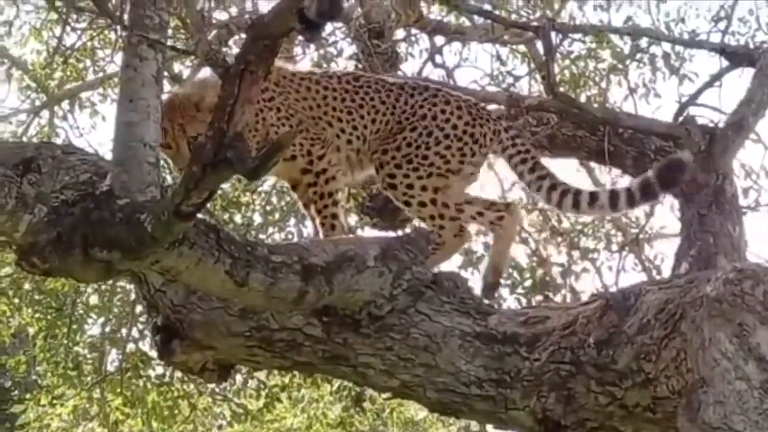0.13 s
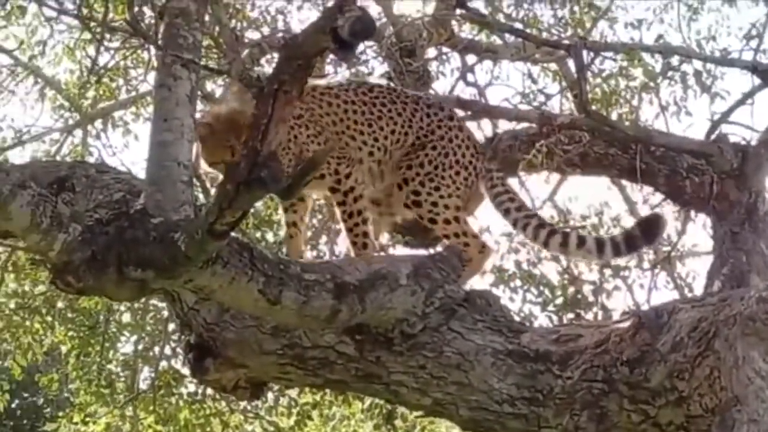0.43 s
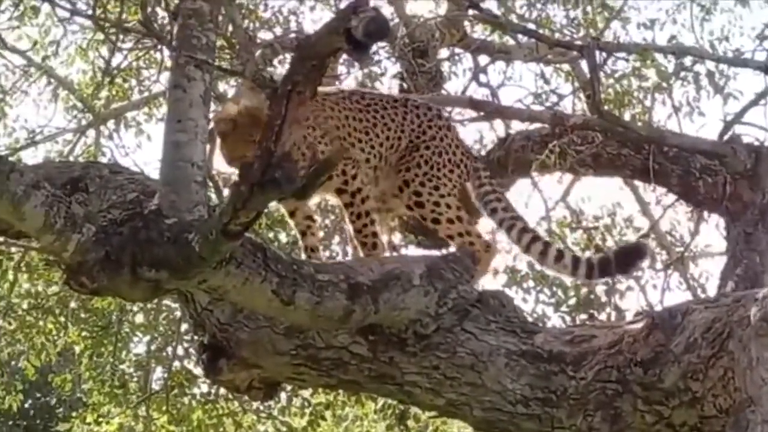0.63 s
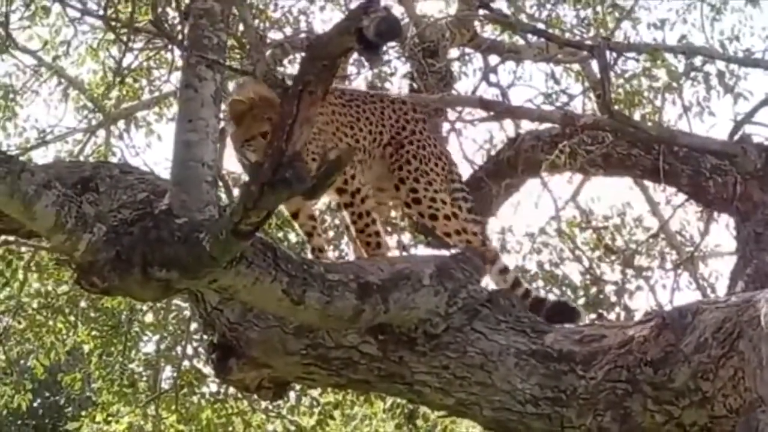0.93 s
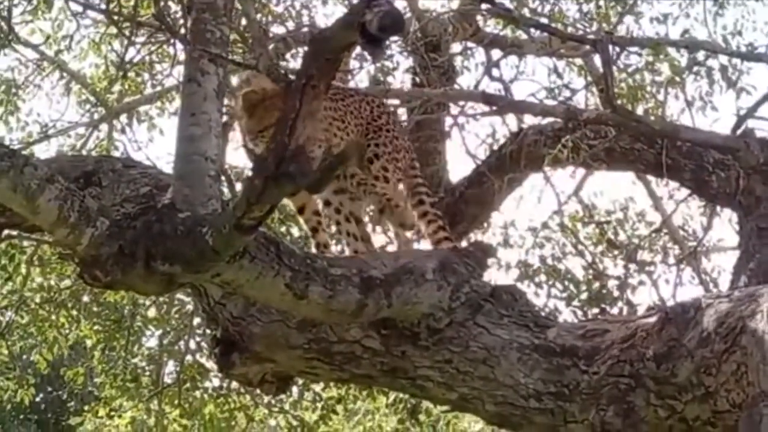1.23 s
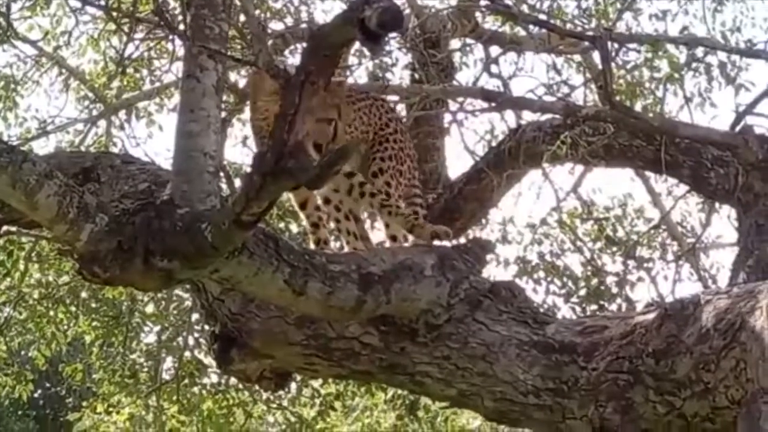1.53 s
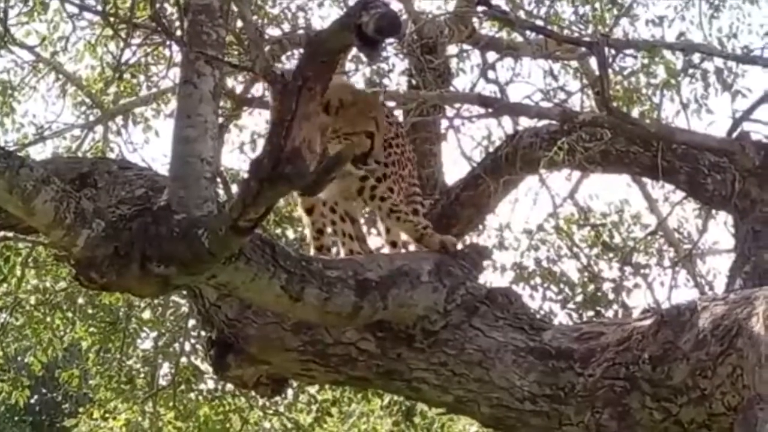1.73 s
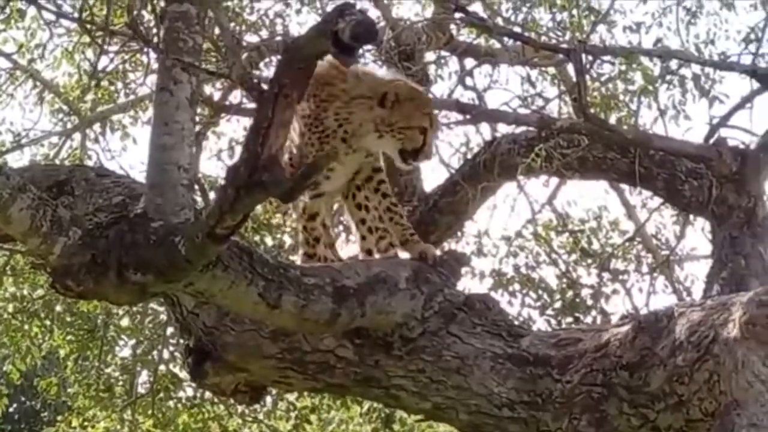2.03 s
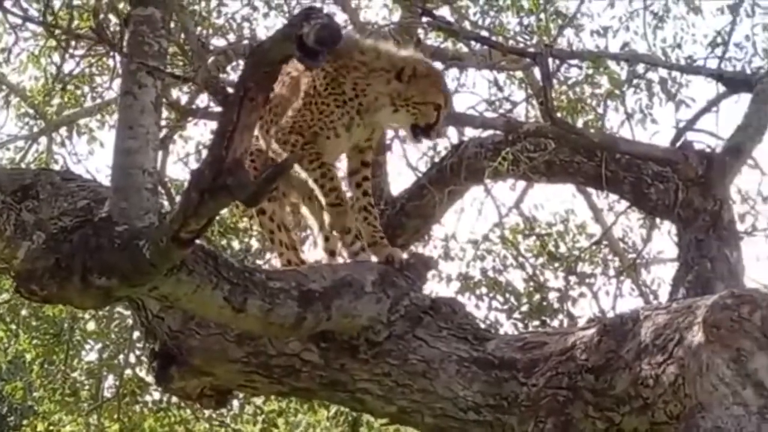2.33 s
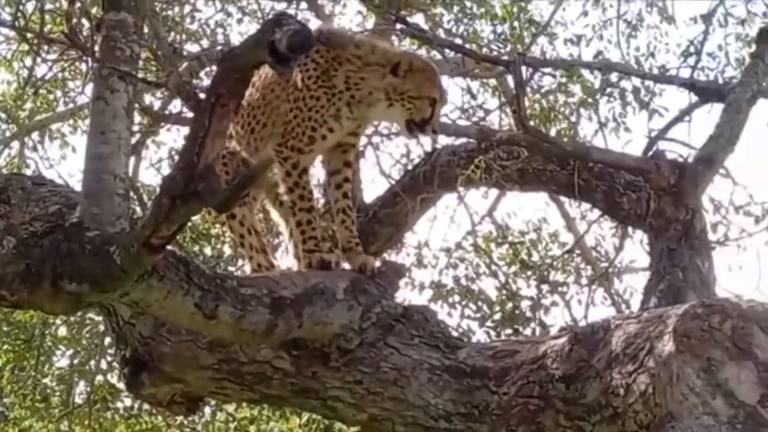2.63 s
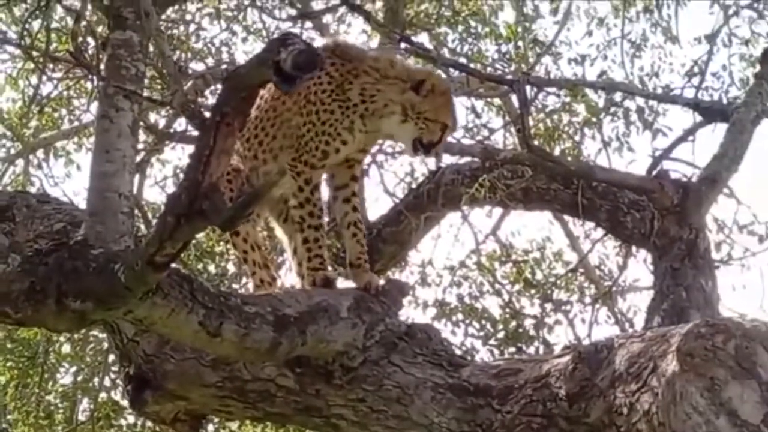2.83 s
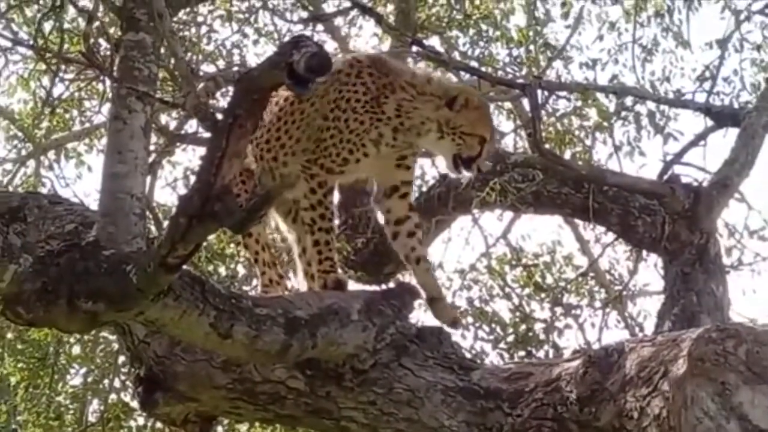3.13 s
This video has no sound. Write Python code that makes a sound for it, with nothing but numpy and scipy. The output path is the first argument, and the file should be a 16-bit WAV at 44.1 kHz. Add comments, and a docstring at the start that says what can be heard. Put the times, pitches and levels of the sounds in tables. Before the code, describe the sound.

One whistled bird call drops in pitch outdoors, above fast trills, cricket chirps and engine rumble

```python
"""Woodland with an idling engine

Open woodland by day. An engine idles a little way off to the right, built from wobbling sine orders over
bands of rumble and air noise. A small bird trills raspy hooked notes on a gliding pitch; a cricket chirps in
tone pulses, a rougher insect buzzes and there is a very faint dry click. A bush bird whistles a held note
that falls, a low short note answers, and the trees scatter both back as dying random echoes."""
import sys
import numpy as np
from scipy import signal
from scipy.io import wavfile

SR = 44100
rng = np.random.default_rng(int(sys.argv[2]) if len(sys.argv) > 2 else 0)


def unload_wav(signal):
    """Save mono or channel-first audio to the path in sys.argv[1] as 16-bit WAV at rate SR, clipped to [-1, 1]."""
    wavfile.write(
        sys.argv[1],
        SR,
        np.round(np.clip(np.atleast_2d(signal).T, -1, 1) * 32767).astype(np.int16),
    )


def boost(x):
    """Linear amplitude factor 10**(x/20) for a level x in decibels (scalar or array-like)."""
    u = np.asarray(x, float) / 20
    return 10 ** u


N = 144207  # length in samples

TREES_T60_S, TREES_ECHOES_PER_S = 0.62, 2000
# wet level and first-echo gap shared by the trill and the cricket
NEAR_WET_DB, NEAR_GAP_S = -7, 0.01


def rms_one(x):
    """Scale to rms 1."""
    return x / np.sqrt(np.mean(x ** 2) + 1e-20)


def in_time(rows):
    """Columns of a table, joined by straight lines in time."""
    time_s, *columns = np.transpose(rows)
    return [np.interp(np.arange(N) / SR, time_s, column) for column in columns]


def at_hz(points, hz):
    """Read a table on a log-frequency axis."""
    table_hz, values = np.transpose(points)
    return np.interp(np.log(hz), np.log(table_hz), values)


def drift(rate_hz):
    """Random wander of rms 1: noise through a two-pole low-pass, drawn every 40 samples."""
    pole = np.exp(-2 * np.pi * rate_hz * 40 / SR)
    noise = rng.standard_normal(N // 40 + 2002)
    slow = signal.lfilter([1], [1, -2 * pole, pole * pole], noise)[2000:]
    return np.interp(np.arange(N) / 40, np.arange(len(slow)), rms_one(slow))


def phase(hz):
    """Running phase of a pitch curve, in radians."""
    return 2 * np.pi * np.cumsum(hz) / SR


def place(x, left_db, left_lag_s):
    """Pan to the right: the left channel is weaker and may come later."""
    sample = np.arange(N)
    left = boost(left_db) * np.interp(sample - left_lag_s * SR, sample, x)
    return np.array([left, x])


def trees(x, t60_s, gap_s):
    """Scattered echoes off trunks, other ones for each ear, dying away."""
    t = np.arange(SR) / SR
    hit = rng.random((2, SR)) < TREES_ECHOES_PER_S / SR
    echoes = rng.standard_normal((2, SR)) * hit * boost(-60 * t / t60_s) * (t > gap_s)
    echoes = echoes / np.sqrt(np.sum(echoes ** 2, axis=1, keepdims=True))
    return signal.fftconvolve(x[None], echoes, axes=1)[:, :N]


# engine idle, before the order trims: time_s, firing_pattern_hz, level_db
ENGINE_IDLE = [(0, 46.9, -30), (.7, 45.18, -28), (1.39, 47.06, -31), (1.6, 46.43, -29), (2.4, 46.38, -32),
               (2.48, 46.1, -26.5), (2.6, 45.86, -31), (2.8, 46.78, -27), (3.04, 46.63, -32),
               (3.15, 47.87, -31.5)]
# engine orders: multiple, trim_db, left_minus_right_db, wobble_db
ORDERS = [(2, 1, -7, 1.21), (3, -16, -6.5, 2), (4, -19, -6.5, 4.5), (5, -20, -3, 1), (6, -31, -6, 4.5)]
ORDER_LIFT_DB, ENGINE_LEFT_LEAD_S = 4, 0.00035
WHINE_HZ, WHINE_DB = 1046, -77.5  # centres that the whine wanders around


def engine():
    """Sine orders of the idling engine, each wobbling in level and phase on its own, plus a faint whine."""
    hz, idle_db = in_time(ENGINE_IDLE)
    turn, out = phase(hz), 0
    for k, trim_db, left_db, wobble_db in ORDERS:
        # only the second order follows the level curve; the others keep its mean
        base_db = idle_db if k == 2 else idle_db.mean()
        level = boost(base_db + ORDER_LIFT_DB + trim_db + wobble_db * drift(15.4))
        right_turn = k * turn + 0.11 * wobble_db * drift(10.4) + 2 * np.pi * rng.random()
        left_turn = right_turn + 2 * np.pi * k * hz * ENGINE_LEFT_LEAD_S
        out = out + level * np.array([boost(left_db) * np.sin(left_turn), np.sin(right_turn)])
    whine = boost(WHINE_DB + 2 * drift(6.9)) * np.sin(phase(WHINE_HZ + 10 * drift(10.25)))
    return out + whine


# relative spectrum of rumble and air: pitch_hz, density_db (per Hz)
AIR_SPECTRUM = [(22, -54.5), (40, -6.5), (190, -6), (260, -20.5), (400, -30), (650, -36), (2300, -37.5),
                (4500, -46), (7300, -46), (8300, -53), (12500, -45)]
# stereo likeness: pitch_hz, left_right_correlation (-1 to 1)
AIR_ALIKE = [(60, 0.45), (290, 0.29), (1400, -0.19)]
# stereo balance: pitch_hz, left_minus_right_db
AIR_TILT = [(250, -2), (900, 1), (5000, -1.5)]
AIR_DB = -44  # rms of the whole bed


def air():
    """Third-octave bands of stereo noise: engine rumble below, leaves and hiss above."""
    out, edges = 0, 22 * 2 ** (np.arange(0, 30) / 3)
    white = rng.standard_normal((2, 2, N + SR))
    for k, (low, high) in enumerate(zip(edges, edges[1:])):
        band = signal.butter(2, [low, high], "band", fs=SR, output="sos")
        # neighbouring bands take different noise; the first second lets the filter settle
        mid, side = signal.sosfilt(band, white[k % 2])[:, SR:]
        hz = np.sqrt(low * high)
        alike = np.clip(at_hz(AIR_ALIKE, hz), -.99, .99)
        half_tilt_db = at_hz(AIR_TILT, hz) / 2
        level_db = at_hz(AIR_SPECTRUM, hz) + 1.73 * (hz < 8000) * drift(11)
        gain = boost(level_db) * boost([[half_tilt_db], [-half_tilt_db]])
        out = out + gain * (np.sqrt(1 + alike) * mid + np.sqrt(1 - alike) * side * [[1], [-1]])
    return boost(AIR_DB) * rms_one(out)


# cricket chirps in turn, dry pulse peaks: level_db
CHIRP_LEVELS = [-68, -65, -66.5, -68, -71, -69, -71, -71, -68, -62.5, -82]
CHIRP_FIRST_S, CHIRP_GAP_S = 0, 0.3186  # gap: from one chirp start to the next
CRICKET_HZ, PULSE_GAP_S, PULSE_S = 7420, 0.041, 0.034
PULSE_SAG_HZ = 288  # pitch drop reached at the end of a pulse


def cricket():
    """Four soft-edged tone pulses to a chirp, each sagging in pitch towards its end."""
    t, level, sag_hz = np.arange(N) / SR, np.zeros(N), np.zeros(N)
    for i, level_db in enumerate(CHIRP_LEVELS):
        for k in range(4):
            start_s = CHIRP_FIRST_S + i * CHIRP_GAP_S + k * PULSE_GAP_S
            part = np.clip((t - start_s) / PULSE_S, 0, 1)
            level += boost(level_db) * np.sin(np.pi * part)
            sag_hz += PULSE_SAG_HZ * part ** 2 * (part < 1)
    song = level * np.sin(phase(CRICKET_HZ * (1 + 0.0089 * drift(67)) - sag_hz))
    return song + boost(NEAR_WET_DB) * trees(song, TREES_T60_S / 2, NEAR_GAP_S)


BUZZ_HZ, BUZZ_DB = 6970, -67  # centre pitch, and centre level before the rasp


def buzz():
    """A second, rougher insect: a wide ragged buzz that swells and fades, heard on the right."""
    swell = boost(BUZZ_DB + 3.7 * drift(14))
    rasp = drift(600)
    tone = np.sin(phase(BUZZ_HZ * (1 + 0.051 * drift(8.5))))
    return place(swell * rasp * tone, -9, 0)


# trill notes, levels before the rasp: hook_s (final hook), hook_hz, hook_db, valley_db
TRILL_NOTES = [(0.012, 6100, -50, -37), (0.085, 6027, -44, -55.5), (.164, 5766, -49, -54.5),
               (0.243, 5740, -54.5, -53), (0.32, 5514, -53.5, -57), (0.397, 5695, -48.5, -53),
               (0.472, 5746, -44, -47), (0.553, 5880, -46, -43.5), (0.635, 5580, -45.5, -45.5),
               (.711, 5546, -46.5, -51), (.79, 5596, -49, -52.5), (0.873, 5140, -55, -52.5),
               (0.951, 5346, -51.5, -49), (1.034, 5590, -43.5, -48.5), (1.116, 5700, -43, -49),
               (1.201, 5867, -40.5, -47), (1.282, 5794, -44, -48), (1.372, 5800, -42, -51.5),
               (1.445, 5266, -64, -55), (1.517, 5657, -37.5, -49), (1.6, 5633, -43.5, -47.5),
               (1.698, 5690, -44, -51), (1.791, 5400, -52.5, -54.5), (1.883, 5450, -60, -53),
               (1.978, 5630, -55.5, -51.5), (2.054, 5510, -56, -55.5), (2.138, 5370, -63.5, -55),
               (2.237, 5357, -46.5, -57), (2.325, 5320, -51, -58), (2.422, 5540, -51, -57.5),
               (2.535, 4950, -62.5, -62.5), (2.79, 4494, -68, -70.5), (2.92, 5000, -52.5, -60.5),
               (3.039, 5060, -61.5, -64), (3.141, 5003, -53, -65), (3.24, 5230, -46, -62)]
# how notes set in and how low they dip: time_s, entry_hz, valley_hz
TRILL_SHAPE = [(0, 6600, 5810), (0.551, 6886, 5460), (.85, 6300, 5320), (1.951, 5690, 5162),
               (3.27, 5286, 4810)]
ENTRY_S, VALLEY_S, RISE_S = 0.035, 0.025, 0.013  # before the hook
EDGE_S, RELEASE_S = 0.006, 0.02
ENTRY_UNDER_VALLEY_DB, GLIDE_DIP_DB = -7, -5
TRILL_RASP = 0.47  # depth of the fast random flutter
ENTRY_SCATTER = 0.3  # pitch scatter, growing with height over the valley
LOW_PARTIAL_DB, TRILL_LEFT_DB, TRILL_T60_S = -12, -9, 0.2


def trill():
    """Each raspy note drops from its entry into a valley and hooks up at the end; the glides are faint."""
    shape_s, shape_entry_hz, shape_valley_hz = np.transpose(TRILL_SHAPE)
    rows = []  # time_s, pitch_hz, level_db
    for s, hook_hz, hook_db, valley_db in TRILL_NOTES:
        entry_hz = np.interp(s, shape_s, shape_entry_hz)
        valley_hz = np.interp(s, shape_s, shape_valley_hz)
        entry_db, glide_db = valley_db + ENTRY_UNDER_VALLEY_DB, valley_db + GLIDE_DIP_DB
        rows += [
            (s - ENTRY_S - 2 * EDGE_S, entry_hz, -80),
            (s - ENTRY_S - EDGE_S, entry_hz, entry_db),
            (s - ENTRY_S, entry_hz, entry_db),
            (s - VALLEY_S - EDGE_S, valley_hz, glide_db),
            (s - VALLEY_S, valley_hz, valley_db),
            (s - RISE_S - EDGE_S, valley_hz, valley_db),
            (s - RISE_S, (valley_hz + hook_hz) / 2, glide_db),
            (s - EDGE_S, hook_hz, hook_db),
            (s + EDGE_S, hook_hz, hook_db),
            (s + EDGE_S + RELEASE_S, hook_hz, -80),
        ]
    hz, db = in_time(rows)
    valley_curve = np.interp(np.arange(N) / SR, shape_s, shape_valley_hz)
    height = np.clip(hz / valley_curve - 1.08, 0, 1)
    turn = phase(hz * (1 + (0.0132 + ENTRY_SCATTER * height) * drift(320)))
    upper = boost(db) * (1 + TRILL_RASP * drift(380)) * np.sin(turn)
    # a partial an octave down, capped in level and fading above 5800 Hz
    low_db = np.minimum(db, -52) + LOW_PARTIAL_DB - np.maximum(hz - 5800, 0) / 50 + 5 * drift(50)
    lower = boost(low_db) * np.sin(turn / 2)
    echoes = boost([[-7], [0]]) * trees(upper, TRILL_T60_S, NEAR_GAP_S)
    return place(upper + lower, TRILL_LEFT_DB, 0) + boost(NEAR_WET_DB) * echoes


# faint dry click, onset level of the noise: start_s, level_db
CLICKS = [(1.4212, -46)]


def click():
    """A single tiny click of noise that decays with a 0.3 ms time constant."""
    t = np.arange(N) / SR
    level = sum(boost(db) * (t > s) * np.exp(-np.abs(t - s) / 0.0003) for s, db in CLICKS)
    return level * rng.standard_normal(N)


WHISTLE_FLUTTER, WHISTLE_FLUTTER_HZ = 0.078, 193.5  # depth as a fraction of level, rate


def note(rows):
    """A nearly pure whistle with a faint fast flutter, silent outside its table."""
    hz, db = in_time(rows)
    t = np.arange(N) / SR
    flutter = 1 + WHISTLE_FLUTTER * np.sin(2 * np.pi * WHISTLE_FLUTTER_HZ * t)
    return flutter * boost(db) * np.sin(phase(hz)) * (t > rows[0][0]) * (t < rows[-1][0])


# whistled call, level before the flutter: time_s, pitch_hz, level_db
CALL = [(2.348, 1430, -54), (2.37, 1414, -28), (2.425, 1465, -24), (2.49, 1493, -27), (2.518, 1443, -19.5),
        (2.53, 1341, -27.5), (2.565, 995, -32), (2.585, 874, -57)]
# low answering note, level before the flutter: time_s, pitch_hz, level_db
LOW_ANSWER = [(2.618, 753, -63), (2.635, 759, -44), (2.66, 783, -37.5), (2.692, 772, -40), (2.71, 776, -55)]
CALL_LEFT_DB, CALL_LEFT_LAG_S = -4.5, 0.00028
ANSWER_LEFT_DB, ANSWER_LEFT_LAG_S = -5.5, 0.00005
WHISTLE_WET_DB, TREES_GAP_S = -14, 0.025


def whistles():
    """The falling call and its answer, with the woodland scattering both back."""
    call, answer = note(CALL), note(LOW_ANSWER)
    near = place(call, CALL_LEFT_DB, CALL_LEFT_LAG_S)
    near = near + place(answer, ANSWER_LEFT_DB, ANSWER_LEFT_LAG_S)
    return near + boost(WHISTLE_WET_DB) * trees(call + answer / 2, TREES_T60_S, TREES_GAP_S)


def scene():
    """All sources together."""
    return whistles() + trill() + cricket() + buzz() + engine() + air() + click()


def roll_off(x):
    """The treble ends steeply here."""
    return signal.sosfilt(signal.butter(12, 15710, fs=SR, output="sos"), x)


def record(dry):
    """Deliver the finished mix."""
    return roll_off(dry)


dry = scene()
out = record(dry)
unload_wav(out)
```